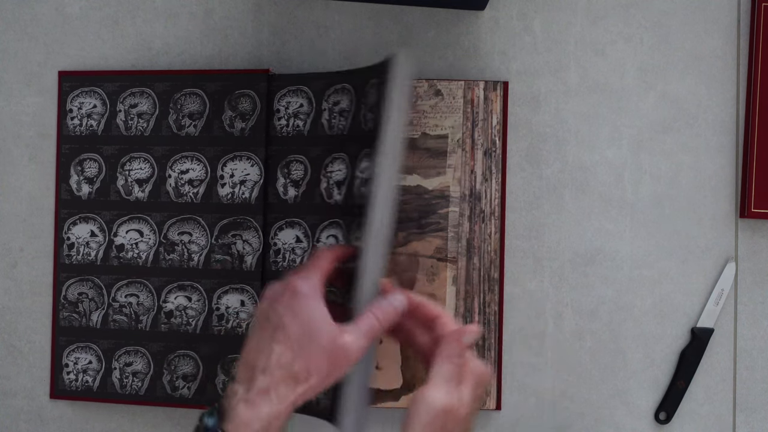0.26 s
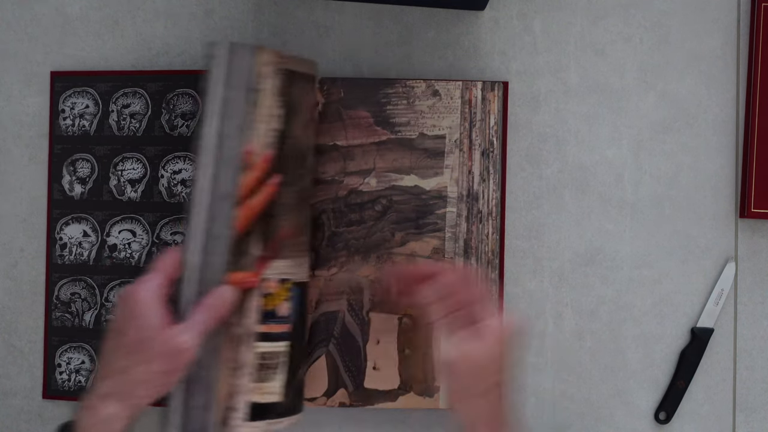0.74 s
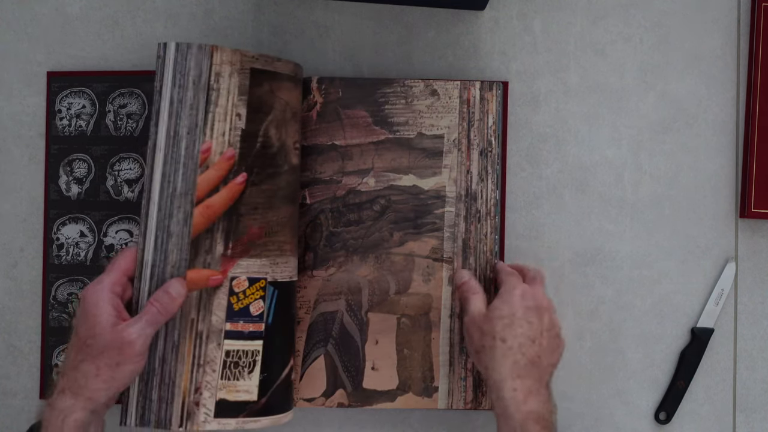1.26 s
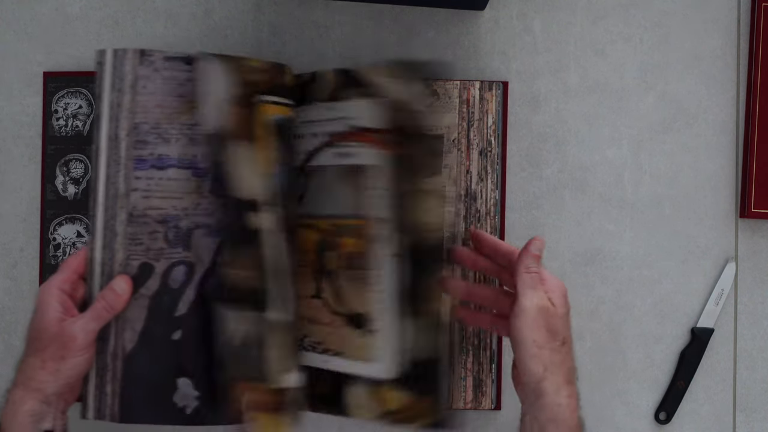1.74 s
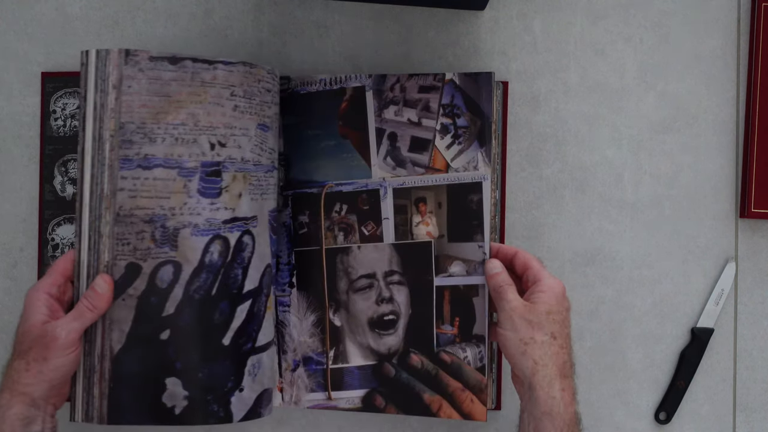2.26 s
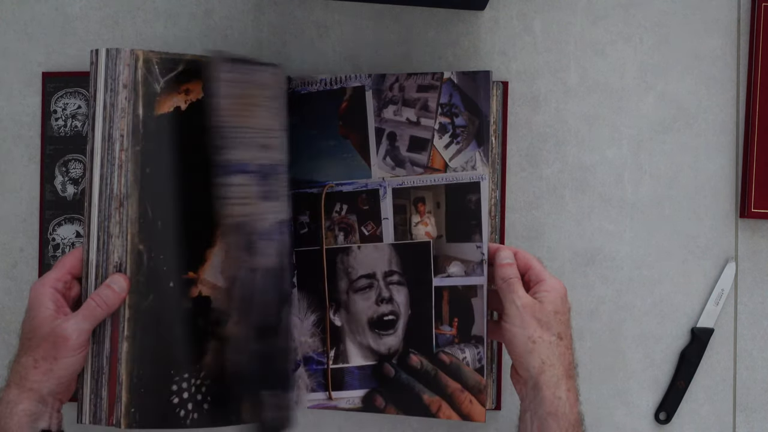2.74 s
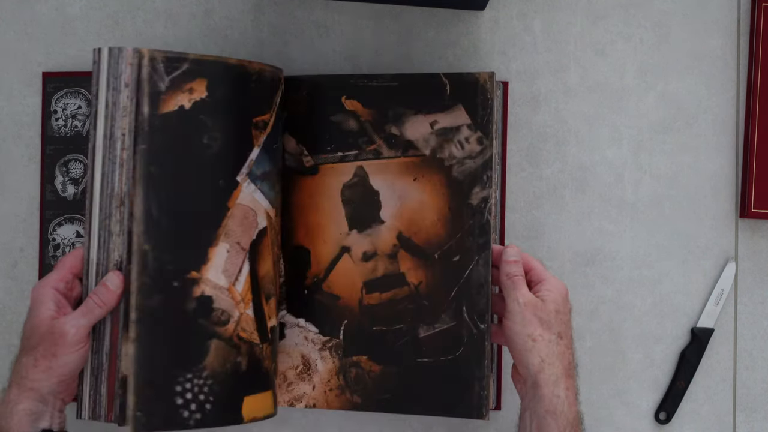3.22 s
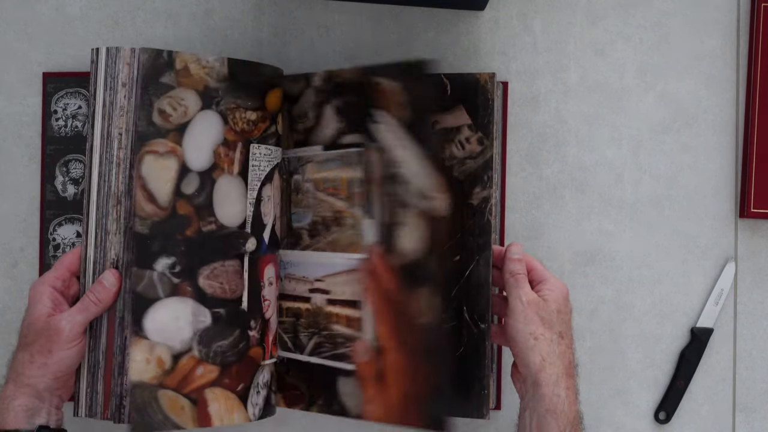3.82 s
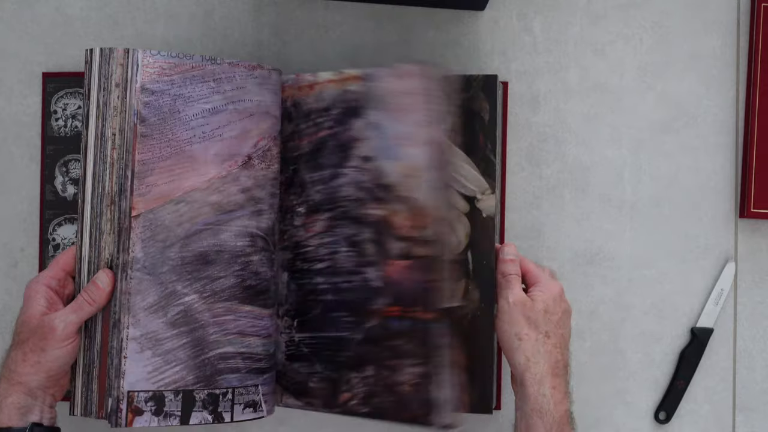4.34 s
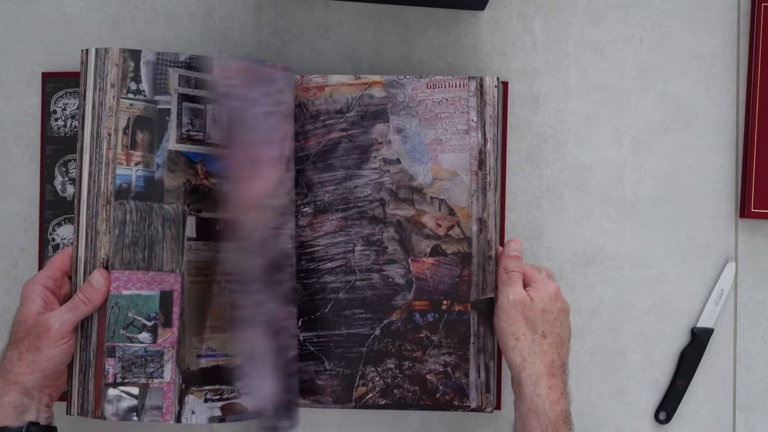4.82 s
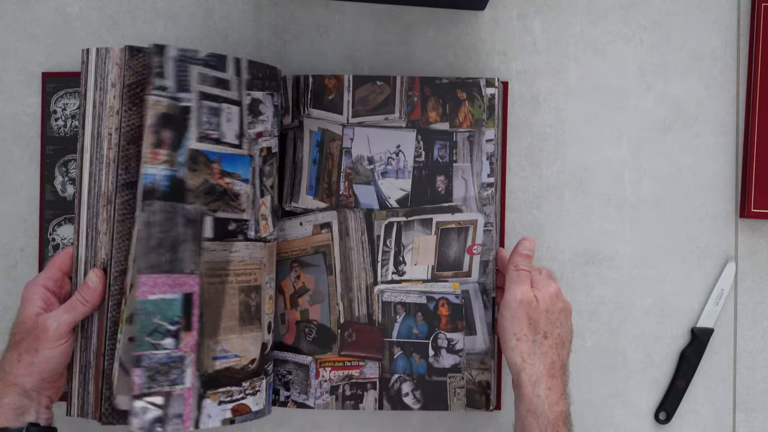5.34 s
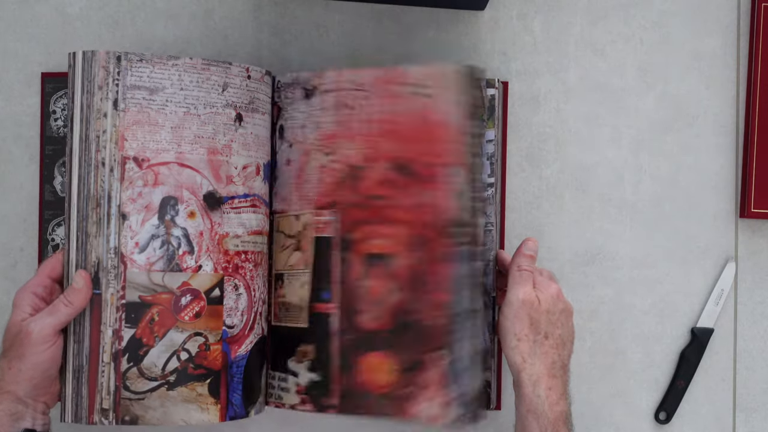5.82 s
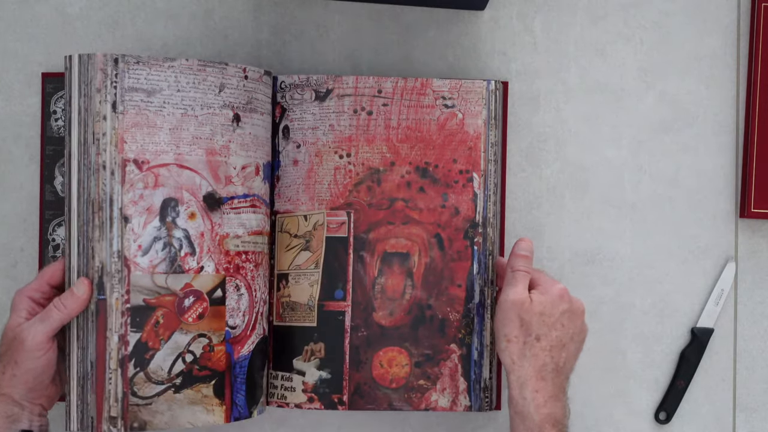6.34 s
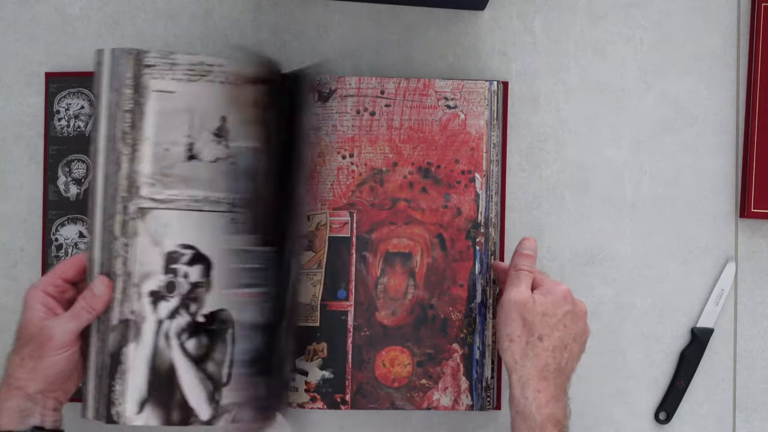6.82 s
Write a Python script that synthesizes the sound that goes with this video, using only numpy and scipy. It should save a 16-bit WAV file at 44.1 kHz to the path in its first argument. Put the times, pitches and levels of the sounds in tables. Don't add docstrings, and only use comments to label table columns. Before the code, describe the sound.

In a bare, quiet room, thick glossy pages of a heavy book are turned by hand on a table. Soft rubbing comes first, then a hollow flap near two seconds, a crisp one at three, smaller flicks at four and five, and the loudest sharp slap at six. A light bright echo follows each. Close overhead microphone, faint rumble and hiss.

```python
import sys
import numpy as np
from scipy import signal
from scipy.fft import rfft, irfft
from scipy.io import wavfile
from scipy.ndimage import uniform_filter1d

SR = 44100
rng = np.random.default_rng(int(sys.argv[2]) if len(sys.argv) > 2 else 0)


def invert_db(level):
    return 10 ** (np.asarray(level, dtype=float) / 20)


def pcm_store(signal):
    levels = np.round(np.clip(np.atleast_2d(signal), -1, 1) * 32767)
    wavfile.write(sys.argv[1], SR, levels.astype(np.int16).T)


N = 311787


def band(x, lo_hz, hi_hz, order=2):
    sos = signal.butter(order, [lo_hz, min(hi_hz, .49 * SR)], "band", fs=SR, output="sos")
    return signal.sosfilt(sos, x)


def resonance(x, hz, width_hz):
    return band(x, hz - width_hz / 2, hz + width_hz / 2, order=1)


def split(x, bands_hz):
    filters = [signal.butter(2, edges, "band", fs=SR, output="sos") for edges in bands_hz]
    return [signal.sosfiltfilt(sos, x) for sos in filters]


def level(x, db):
    return x * invert_db(db) / np.sqrt(np.mean(x ** 2))


def add(track, s, sound):
    i = int(s * SR)
    track[i:i + len(sound)] += sound[:N - i]


def walk(rate):
    hold = int(SR / rate)
    steps = np.repeat(rng.standard_normal(N // hold + 1), hold)
    return 1.086 * uniform_filter1d(uniform_filter1d(steps, hold), hold)[:N]


def coloured(points):
    hz, db = np.transpose(points)
    f = np.clip(np.fft.rfftfreq(N, 1 / SR), 1, 15000)
    colour = invert_db(np.interp(np.log(f), np.log(hz), db))
    return irfft(rfft(rng.standard_normal(N)) * colour, N)


def engine_drone():
    # crest in seconds, level in dB, half length in seconds.
    swells = [(0.05, -70, 0.14), (0.75, -71, 0.075), (1.014, -70.5, .06), (1.254, -70.5, 0.088),
              (1.694, -69, 0.065), (2.5, -66.5, 0.22), (3.15, -77, .12), (3.933, -65.5, 0.097),
              (4.6, -81, .15), (5.245, -73.5, 0.29), (6.303, -74.5, 0.35), (6.773, -80, 0.26)]
    t = np.arange(N) / SR
    loudness = invert_db(-83)
    for s, db, half_s in swells:
        loudness = loudness + invert_db(db) * np.exp(-((t - s) / half_s) ** 2)
    return np.sin(2 * np.pi * np.cumsum(94 + 2.36 * walk(6.6)) / SR) * loudness


def air():
    # pitch in Hz, level in dB per Hz.
    shared_colour = [(18, -75), (30, -25), (96, -10.5), (163, -2.5), (196, -4), (242, -4), (399, -7.5),
                     (641, -9.5), (713, -10.5), (904, -12.5), (1620, -15), (2670, -21), (11400, -30),
                     (15200, -30.5), (16500, -63)]
    # pitch in Hz, level in dB per Hz.
    differing_colour = [(18, -58), (30, -28), (122, -2), (235, 1), (359, -3), (388, -4), (676, -6),
                        (2810, -16.5), (3860, -21), (5890, -24), (16500, -44.5)]
    # pitch in Hz, width in Hz, level in dB.
    duct = [(52, 18, -84.5), (154.5, 30, -74)]
    mid = level(coloured(shared_colour), -63.5) * invert_db(0.61 * walk(0.965))
    for hz, width_hz, db in duct:
        rumble = resonance(rng.standard_normal(N), hz, width_hz)
        mid += level(rumble, db) * invert_db(2 * walk(3))
    mid += engine_drone()
    side = level(coloured(differing_colour), -68.5)
    return np.array([mid + side, mid - side])


def ticks():
    # start in seconds,
    # energy in dB at 5 kHz, tilt in dB per octave, bend in dB per octave squared.
    snaps = [(0.0185, -22, 3.8, -6.5), (0.2641, -29.5, 6, -4), (0.9087, -37, 2.5, 0), (1.113, -42, 12, -6),
             (2.9095, -36.5, 6, -0.8), (2.922, -41, 4, 0), (2.9722, -38, 5, .1), (2.993, -42, 8, -2),
             (2.9977, -38, -2, -4), (3.0183, -44, 3, -5), (3.0245, -32.5, 5, -1.2), (3.066, -45, 3.5, -4),
             (3.0715, -27, 4.5, -1), (3.8473, -37.5, -0.5, 1), (3.9223, -45, 7.5, -1),
             (3.943, -33.5, 13, -7), (4.084, -28.5, 0.5, -1), (4.1827, -41, -1, -1), (5.2444, -43, 3, -4),
             (5.4151, -47, 0, -4), (5.7653, -45.5, 9, -3), (6.3107, -45, .1, 1), (6.3668, -46, -5, 0.5),
             (6.462, -34.5, -5.5, -7), (6.97, -46, 8.5, -3), (6.9874, -47, 5, -3), (7.0039, -39, 8, -3.5)]
    # start in seconds,
    # energy in dB at 5 kHz, tilt in dB per octave, bend in dB per octave squared.
    crackles = [(0.9443, -39.5, 3, -1.5), (0.9862, -53, 7, .1), (1.0185, -49, 2.5, 3),
                (1.0854, -52, 3.5, 5), (1.553, -44.5, -2, -0.2), (1.8548, -21, -11.5, -7),
                (1.859, -37.5, 2, 4.5), (1.87, -38, -7, -3), (1.8815, -27, -1.5, -2), (1.9688, -40, 0, 4),
                (1.9733, -25.5, -5, -3.5), (1.9876, -44, 1, 6.3), (2.026, -25, -11, -5),
                (2.073, -32, 2, -3), (2.1747, -36, -1, -2), (2.227, -49, -3, -6), (2.277, -45, .1, -1),
                (2.302, -43, -2, 0), (3.094, -24, -7, -4.5), (4.099, -47, -8, -4), (5.6114, -50.5, -2.5, 3),
                (5.9, -16, 1, -.6), (5.9759, -24, -3, -0.5), (6.0066, -2, -2, -1), (1.709, -40, -8, -3),
                (2.1874, -39, 3, -5), (2.9632, -59, 5, -3), (3.11, -31, -3, -0.5), (0.8007, -49, 4, -6)]
    bands_hz = [(1000, 2500), (2500, 5000), (5000, 10000), (10400, 16500)]
    octaves = np.array([-1.5, -.5, .5, 1.5])
    snap_ms, crackle_ms = .3, 1.83
    snap_room_db = -2.5
    lead = 64
    toward, around = np.zeros((2, N))
    t = np.arange(512) / SR
    click = split(np.roll(1. * (t == 0), lead), bands_hz)
    rows = [(*row, snap_ms) for row in snaps] + [(*row, crackle_ms) for row in crackles]
    for (s, mid_db, tilt, bend, ms), chance in zip(rows, rng.standard_normal((len(rows), len(t)))):
        band_db = mid_db + tilt * octaves + bend * octaves ** 2 - 1.0
        crackle = chance * np.exp(-1000 * t / ms)
        crackle[0] = 1.5 * np.sign(crackle[0])
        tones = rfft(np.roll(crackle, lead))
        crackle = irfft(tones / uniform_filter1d(np.abs(tones), size=15))
        room_db = snap_room_db if ms == snap_ms else 0
        for track, parts, db in ((toward, split(crackle, bands_hz), 0), (around, click, room_db)):
            tick = sum(p * invert_db(p_db) / np.linalg.norm(p) for p, p_db in zip(parts, band_db))
            add(track, s - lead / SR, invert_db(db) * tick)
    return np.array([toward, around])


def page_mirror(creases):
    # start in seconds, mirror level in dB.
    close_snaps = [
        (3.0715, -15.5),
        (5.9, -6),
        (6.0066, -17.5),
    ]
    close_s = .008
    t = np.arange(N) / SR
    near = sum(invert_db(db) * (np.abs(t - s - close_s / 2) < close_s) for s, db in close_snaps)
    strong = near * creases
    strong = (np.roll(strong, shift=7, axis=1) + np.roll(strong, shift=6, axis=1)) / 2.1
    return invert_db(-21) * np.roll(creases, shift=6, axis=1) + strong


def slides():
    # start in seconds, length in ms, level in dB at 3-9 kHz,
    # weight as the level in dB of 0.6-3 kHz relative to that.
    rubs = [(.78, 160, -75, -7), (.905, 41, -65.5, -7), (.94, 116, -67, -5), (1.03, 200, -76, -7),
            (1.37, 57, -72, -20), (1.64, 124, -75, 12), (1.72, 290, -67.5, -2.5), (1.855, 124, -64, 10),
            (1.966, 60, -54.5, 4.5), (2.021, 28, -54, 9.5), (2.16, 200, -71, -2), (2.91, 350, -75, 2),
            (4.5, 330, -89, 8), (5.239, 63, -68.5, 11.5), (5.4, 40, -77, 6), (5.58, 200, -80, 0),
            (5.75, 330, -79, -6), (5.973, 17, -51.5, 4.5), (3.091, 18.5, -53, 2), (3.705, 29, -75, 9.5),
            (4.09, 280, -75, -4), (4.581, 23, -69, 5), (1.672, 35, -68.5, 6), (6.29, 83, -68, -2),
            (6.456, 34, -64, 1.5), (6.96, 66, -71.5, -19)]
    bands_hz = [(3000, 9000), (9000, 16500), (600, 3000)]
    # pitch in Hz, width in Hz, level in dB.
    sheet = [(2650, 210, -19), (3900, 290, -15.5), (5500, 680, -13.5)]
    slips = rng.random(N) < 400 / SR
    slips = slips * invert_db(3.5 * np.minimum(rng.exponential(size=N), 2))
    slips = slips * np.clip(rng.standard_normal(N), -1.5, 1.5)
    rub = rng.standard_normal(N) * invert_db(3 * walk(60)) + level(slips, -13)
    rub += sum(level(resonance(rub, hz, width_hz), db) for hz, width_hz, db in sheet)
    hiss = np.array([level(b, 0) for b in split(rub, bands_hz)])
    out = np.zeros(N)
    for s, ms, db, weight_db in rubs:
        top_db = -2.5 - 0.24 * weight_db
        way = np.linspace(0, 1, int(ms * SR / 1000))
        touch = np.sin(np.pi * way ** 0.5)
        piece = hiss[:, int(s * SR):][:, :len(way)]
        add(out, s, touch * (invert_db(db + np.array([0, top_db, weight_db])) @ piece))
    return out


def flaps():
    # start in seconds, length in ms, level in dB, starting pitch in Hz.
    falls = [(1.67, 30, -49, 1000), (1.881, 24, -34, 591), (1.887, 11.6, -28, 1305),
             (1.898, 8.5, -35.5, 930), (1.939, 47, -52, 910), (2.01, 29, -42, 318),
             (2.024, 13.6, -30.5, 585), (2.024, 9.2, -32, 936), (2.033, 8, -28, 866),
             (2.041, 16, -35.5, 948), (3.155, 14, -51, 1700), (3.093, 18, -35.5, 937),
             (3.096, 25, -40, 612), (3.104, 13.2, -43, 1880), (4.0842, 2.7, -39.5, 2540),
             (5.111, 10.8, -44, 523), (5.113, 22, -62, 1400), (5.126, 15.2, -40.5, 600),
             (5.14, 18, -57, 980), (7.0605, 7, -34.5, 560), (5.901, 30, -46.5, 253), (5.9, 3.5, -35, 2000),
             (5.913, 19, -37, 636), (5.974, 4.9, -30.5, 590), (5.983, 9.5, -34.5, 596),
             (5.994, 28, -51, 165), (6.0068, 2.83, -19.5, 1900), (6.007, 9.1, -26.5, 584),
             (7.015, 38, -48.5, 443), (7.052, 9, -44.5, 480)]
    pocket_hz, glide_share = 1400, .15
    ragged_cycles = 26.8
    toward, around = np.zeros((2, N))
    for (s, ms, db, start_hz), chance in zip(falls, rng.standard_normal((len(falls), 4096))):
        end_hz = start_hz * (pocket_hz / start_hz) ** glide_share
        rough = np.clip(ms * start_hz / 1000 / ragged_cycles, 0, 1)
        n = int(np.clip(ms * SR / 1000, 32, 4096))
        lo_hz, hi_hz = 0.83 * min(start_hz, end_hz), 1.406 * max(start_hz, end_hz)
        wobble = np.sin(2 * np.pi * np.cumsum(np.geomspace(start_hz, end_hz, n)) / SR)
        gusts = level(band(chance, lo_hz, hi_hz)[-n:], -1.66)
        swell = np.sin(np.pi * np.arange(n) / n) ** 0.43
        flap = invert_db(db) * swell * ((1 - rough) * wobble + rough * gusts)
        add(toward, s, flap)
        push = band(1. * (np.arange(1024) == 0), lo_hz, hi_hz)
        push = irfft(np.abs(rfft(push)) * np.exp(1j * np.angle(rfft(chance[:1024]))))
        add(around, s, push * invert_db(-2.0) * np.linalg.norm(flap) / np.linalg.norm(push))
    return np.array([toward, around])


def room(toward, around):
    # delay in ms, level in dB.
    echoes = [
        (5.7, -20.5),
        (13, -18),
        (19, -23),
    ]
    # pitch in Hz, seconds to fall by 60 dB, level in dB, side minus mid in dB.
    dying = [(300, 0.62, -31, -8), (700, 0.71, -35, -9), (1500, 0.76, -36, -11.5),
             (3150, 0.67, -35.5, -11.5), (6000, 0.63, -32.5, -28), (9300, 0.52, -33.5, -23),
             (13900, 0.39, -31.5, -43)]
    t = np.arange(SR) / SR
    tail, near = np.zeros((2, SR)), np.zeros((2, 2048))
    hz, *columns = np.transpose(dying)
    for centre in 200 * 2 ** np.arange(0, 6.6, .5):
        t60, db, side_db = [np.interp(np.log(centre), np.log(hz), c) for c in columns]
        mid, side = band(rng.standard_normal((2, SR)), centre / 2 ** 0.25, centre * 2 ** 0.26)
        wide = mid + invert_db(side_db) * side * np.array([[1], [-1]])
        tail += wide * invert_db(db - 2.5 - 60 * t / t60)
    tail *= np.clip((t - .002) / 0.0017, 0, 1)
    near[:, 0] = 1
    near[:, :2] += invert_db(-22) * np.array([[0.55, -0.81], [-1.8, 0.39]])
    for ms, echo_db in echoes:
        near[:, int(ms * SR / 1000)] += invert_db(echo_db)
    direct = signal.fftconvolve(toward[None], near, axes=1)[:, :N]
    return direct + signal.fftconvolve(around[None], tail, axes=1)[:, :N]


def scene():
    creases = ticks()
    creases = creases + page_mirror(creases)
    toward, around = creases + flaps() + slides()
    return room(toward, around) + air()


def top_cut(x):
    return signal.sosfilt(signal.butter(12, 16850, fs=SR, output="sos"), x)


def record(dry):
    heard = signal.sosfilt(signal.butter(3, 42, "high", fs=SR, output="sos"), dry)
    heard = signal.sosfilt(signal.ellip(8, .3, 30, 15850, fs=SR, output="sos"), heard)
    return top_cut(heard)


dry = scene()
out = record(dry)
pcm_store(out)
```